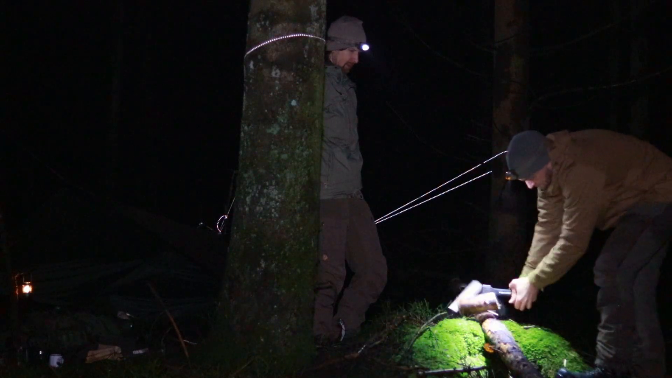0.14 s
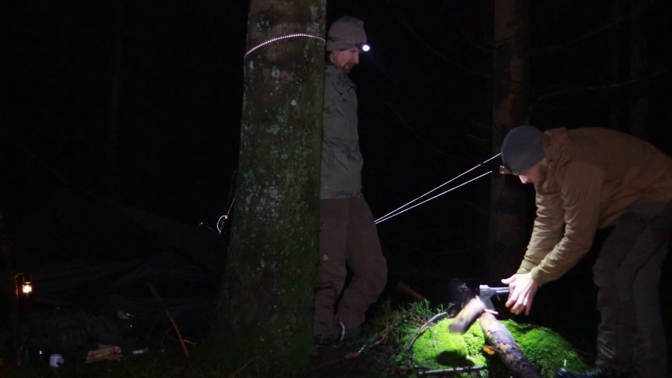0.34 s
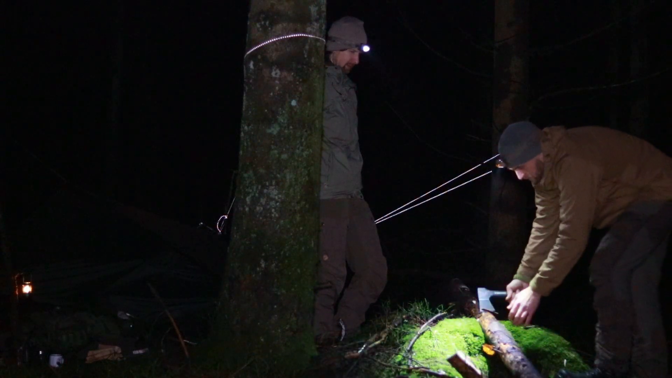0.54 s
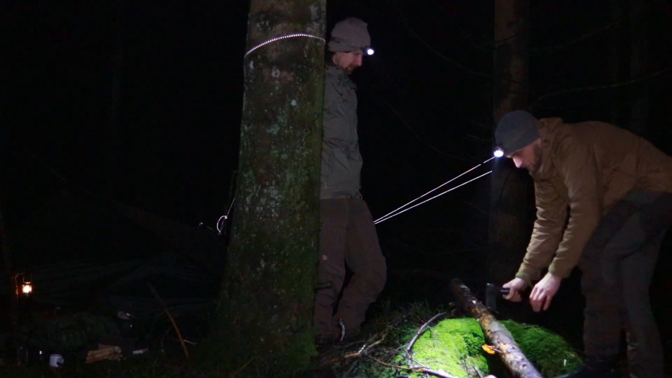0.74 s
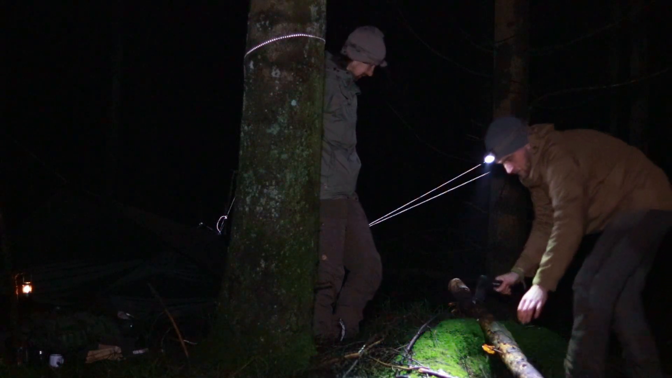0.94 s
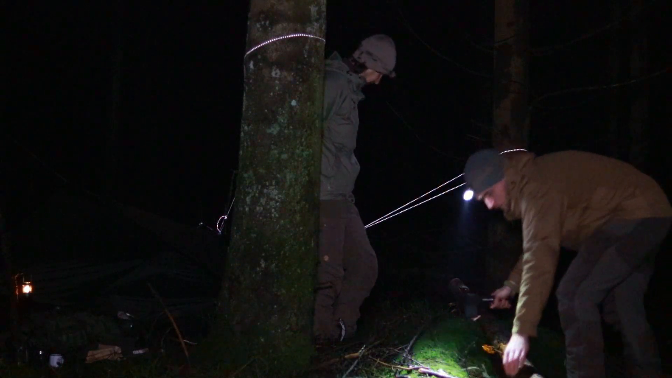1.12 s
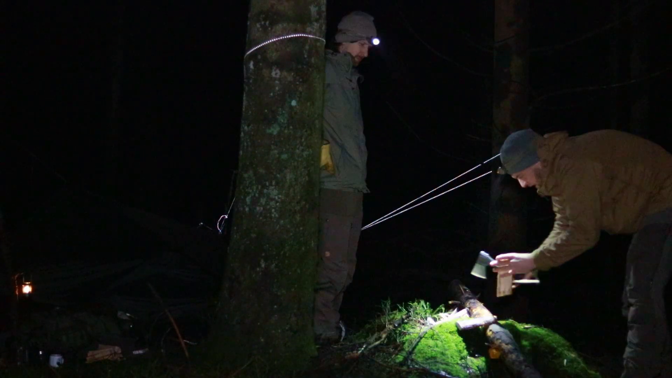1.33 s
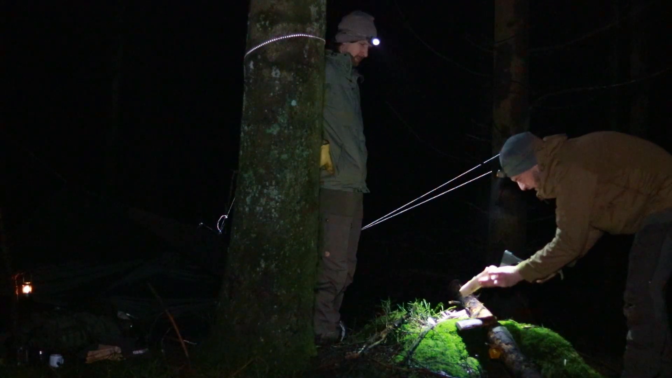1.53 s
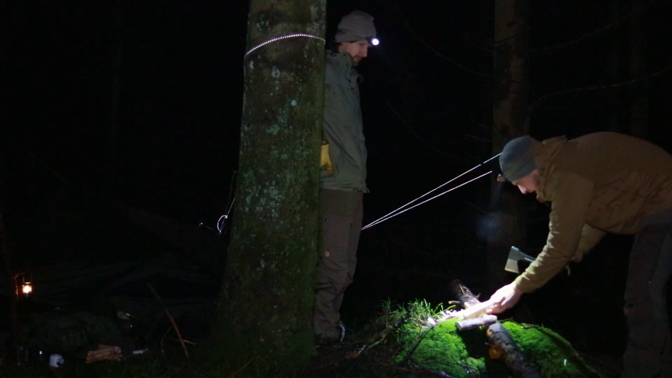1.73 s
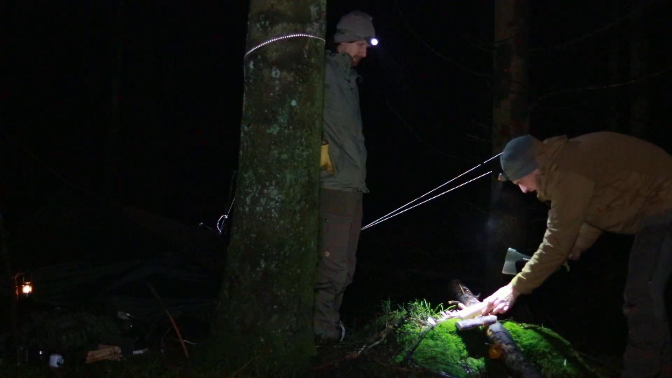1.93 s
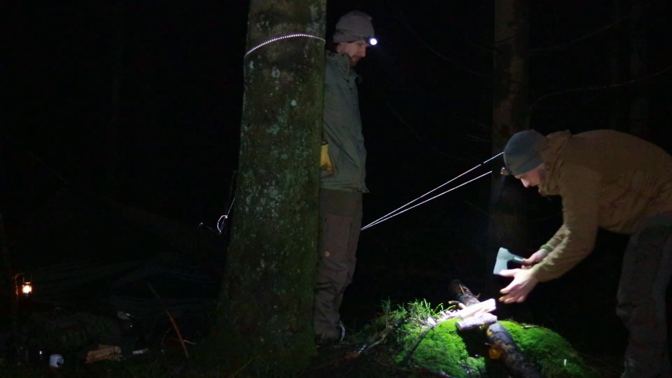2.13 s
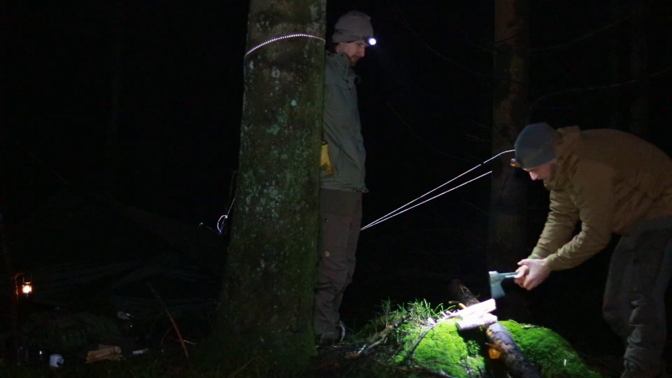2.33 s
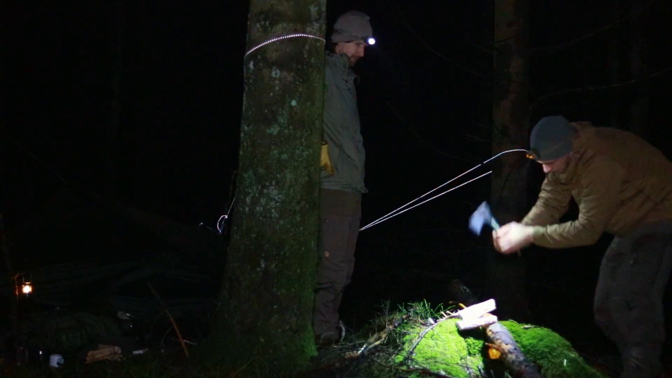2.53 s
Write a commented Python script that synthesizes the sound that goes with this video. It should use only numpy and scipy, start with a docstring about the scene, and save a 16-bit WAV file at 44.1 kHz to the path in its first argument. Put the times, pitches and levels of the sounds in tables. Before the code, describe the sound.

One sharp hatchet chop cracks firewood on a log, trees echo, then a piece of wood knocks

```python
"""Splitting wood in a night forest

A hatchet splits a short billet on a log. Over a far hush and hiss, bands of noise, the log and billet thud
as ringing modes behind a sinking wave, and the steel head rings briefly as a set of short tones.
Cracks, ticks, an echo of the blow and parts of a later knock are dying noise bursts; the trunks scatter
the blow back as a wash of noise and tones. Later a piece of wood knocks on the log."""
import sys
import numpy as np
from scipy import signal
from scipy.io import wavfile

SR = 44100
rng = np.random.default_rng(int(sys.argv[2]) if len(sys.argv) > 2 else 0)


def voltage_ratio(decibels):
    """Convert decibels (scalar or array-like) to amplitude ratios, 20 dB per decade."""
    exponent = np.asarray(decibels, float) / 20
    return 10 ** exponent


def int16_out(signal):
    """Quantize to a 16-bit WAV file."""
    q = np.round(np.clip(np.atleast_2d(signal).T, -1, 1) * 32767)
    wavfile.write(sys.argv[1], SR, q.astype(np.int16))


N = 114660  # length in samples, 2.6 s


def rms_one(x):
    """Scales a sound to an rms of 1."""
    return x / np.sqrt(np.mean(x ** 2) + 1e-20)


def in_time(rows):
    """Draws straight lines through (second, value) rows, one value per sample."""
    return np.interp(np.arange(N) / SR, *np.transpose(rows))


def at_hz(points, hz):
    """Reads a (Hz, value) curve at one pitch, on a logarithmic pitch scale."""
    points = np.array(points)
    return np.interp(np.log(hz), np.log(points[:, 0]), points[:, 1])


def drift(rate_hz):
    """Slow random wander with an rms of 1: smoothed noise, made at every 40th sample and joined by lines."""
    pole = np.exp(-80 * np.pi * rate_hz / SR)
    white = rng.standard_normal(N // 40 + 2002)
    slow = signal.lfilter([1], [1, -2 * pole, pole * pole], white)[2000:]  # drop the filter's start-up
    return np.interp(np.arange(N) / 40, np.arange(len(slow)), rms_one(slow))


def ring(clicks, hz, t60):
    """A unit click sets off a sine of height 1 that falls by 60 dB in t60 seconds."""
    pole, turn = voltage_ratio(-60 / (t60 * SR)), 2 * np.pi * hz / SR
    # the tiny offset keeps the filter from slowing down on near-zero numbers
    return signal.lfilter([0, np.sin(turn)], [1, -2 * pole * np.cos(turn), pole * pole], clicks + 1e-18)


def resonance(x, hz, width):
    """Lets through a narrow band, width in Hz, with a gain of about 1 at its centre."""
    pole = np.exp(-np.pi * width / SR)
    top = np.array([1, 0, -1]) * (1 - pole * pole) / 2
    return signal.lfilter(top, [1, -2 * pole * np.cos(2 * np.pi * hz / SR), pole * pole], x)


def banded_noise(spectrum, patchy_db, shape=lambda hz: 0):
    """Third-octave bands of noise, each with its own level, random flicker and course in time, in dB."""
    out, edges = 0, 22 * 2 ** np.arange(0, 9.8, 1 / 3)
    white = rng.standard_normal((2, N))
    for k, (low, high) in enumerate(zip(edges, edges[1:])):
        hz = np.sqrt(low * high)
        sos = signal.butter(2, [low, high], "band", fs=SR, output="sos")
        band = signal.sosfilt(sos, white[k % 2])  # neighbours use separate noise
        level_db = at_hz(spectrum, hz) + patchy_db * drift(11.1) + shape(hz)
        out = out + band * voltage_ratio(level_db)
    return out


# Colour of the far hush and recorder hiss. Each row: pitch in Hz, relative level in dB per Hz.
NIGHT_COLOUR = [(15, -80), (25, -44), (76, -19.5), (146, -14.5), (176, -14.5), (244, -5.5), (376, -3),
                (596, -2), (1760, -14), (2640, -22), (2870, -21.5), (14200, -28), (16200, -26.5)]
# Course of the hush and hiss. Each row: time in seconds, level in dB before a small lift.
NIGHT_COURSE = [(0.0, -52), (0.25, -50.5), (0.38, -50), (0.81, -50.5), (2.45, -50), (2.6, -49.5)]
NIGHT_PATCHY_DB = -0.4  # depth of the flicker; the sign only turns it over


def night():
    """Far hush and recorder hiss: steady noise in bands that flicker slightly."""
    lift_db = 0.94
    hush = rms_one(banded_noise(NIGHT_COLOUR, NIGHT_PATCHY_DB))
    return voltage_ratio(in_time(NIGHT_COURSE) + lift_db) * hush


# How strongly the trunks send the blow back. Each row: time in seconds, level in dB.
SCATTER_COURSE = [(.232, -22.5), (.26, -37.5), (.29, -37), (.36, -36), (.41, -33.5), (.47, -38),
                  (.55, -39.5), (.7, -42.5), (1.0, -48), (1.4, -48.5), (2.0, -83)]
# Broad colour of the echo. Each row: pitch in Hz, relative level in dB per Hz.
ECHO_COLOUR = [(240, -61), (400, -8.5), (719, -7.5), (826, -8.5), (1730, -19), (1840, 4.5), (2020, -2),
               (2290, 4.5), (3310, -9.5), (4380, -7.5), (5780, -13), (7870, -16.5), (16000, -35)]
# Extra loss on the way. Each row: pitch in Hz, loss in dB per second since the blow.
PATH_LOSS = [(400, 47), (1000, 16), (2000, 12), (4400, 16), (7500, 19), (12000, 62)]
# Wood and steel tones carried by the echo. Each row: pitch in Hz, width in Hz, level in dB against the wash.
CARRIED_TONES = [(721, 27, -12.5), (1864, 22, -6), (4360, 200, -4.5), (7560, 500, -14), (12500, 980, -22)]
# Bright early return from the nearest trunks. Each row: pitch in Hz, relative level in dB per Hz.
NEAR_COLOUR = [(1760, -33), (3000, -6), (3630, -37), (4300, -13), (5430, -21), (7850, 11), (16200, -19)]
BLOW_S, ECHO_PATCHY_DB = .232, 1.5
NEAR_DB, NEAR_T60_S = -40.5, 0.78


def forest():
    """Countless trunks return the blow as a wash that dips, swells and dies, the middle pitches last."""
    since = np.maximum(np.arange(N) / SR - BLOW_S, 0)
    wash = banded_noise(ECHO_COLOUR, ECHO_PATCHY_DB, lambda hz: -at_hz(PATH_LOSS, hz) * since)
    early = wash[int(.25 * SR):int(.45 * SR)]
    wash = wash / np.sqrt(np.mean(early ** 2))  # rms 1 just after the blow
    for hz, width, db in CARRIED_TONES:
        tone = resonance(rng.standard_normal(N), hz, width)
        tone = resonance(tone, hz, 3 * width)
        wash = wash + rms_one(tone) * voltage_ratio(db - at_hz(PATH_LOSS, hz) * since)
    near = rms_one(banded_noise(NEAR_COLOUR, ECHO_PATCHY_DB))
    near = near * voltage_ratio(NEAR_DB - 60 * since / NEAR_T60_S)
    return (wash * voltage_ratio(in_time(SCATTER_COURSE)) + near) * (since > 0)


# Short noise bursts: cracks, ticks, an echo of the blow, a knock and its faint forest tail.
# Each row: start in seconds, level in dB, centre in Hz, width in octaves, time to fall by 60 dB in seconds.
NOISE_BURSTS = [(0.2253, -15, 2400, 0.83, 0.011), (.2285, -58, 3500, 1.6, .012),
                (0.231, -14, 5960, 1.56, 0.028), (.2352, -19, 6000, 3.2, .014),
                (.2410, -25, 4500, 2.8, .01), (.2461, -19, 5500, 3.4, .013), (.3645, -26, 4200, .4, .012),
                (.3785, -26, 2700, .5, .012), (.5572, -27, 1144, 0.56, 0.012),
                (0.5805, -46, 10800, 0.84, 0.19), (0.5897, -31.5, 4630, .2, 0.016),
                (.578, -30, 4750, 0.23, 0.013), (.630, -45, 9000, 1.2, 0.0072),
                (0.8997, -36.5, 8800, 1.3, 0.011), (1.0737, -36.5, 6960, 1.4, 0.0052),
                (1.0748, -34.5, 790, 3.1, 0.012), (1.078, -49, 12500, .6, .012),
                (1.0904, -35, 2120, 1.2, 0.00656), (1.1508, -36.5, 5400, 1.6, 0.0068),
                (1.1567, -19, 3480, 3.7, 0.0078), (1.1563, -29, 7400, 1.7, 0.0043),
                (1.172, -42, 5500, .8, .012), (1.137, -47, 5500, 1.5, .04), (1.160, -37.5, 3880, 2.9, 0.03),
                (1.164, -58, 5000, 1.8, 1), (1.375, -55, 4950, 1.2, 0.0175),
                (1.3912, -38.5, 3200, 0.64, 0.014), (1.3908, -46.5, 7500, 0.61, 0.0113),
                (1.402, -49, 6960, 1.1, 0.018), (1.425, -48, 5370, 1, .04), (1.435, -46, 5370, 1.4, 0.036),
                (1.45, -40, 883, 2.5, 0.009), (1.31, -59, 12500, 0.5, .1), (1.80, -48, 2200, .7, .012),
                (1.861, -47, 4200, .2, .02), (1.861, -47.5, 8450, 0.63, 0.013)]
BURST_EDGE = 1.81  # the first instant of a burst, against its noise


def noise_bursts():
    """Each burst is noise in a band that dies away evenly in dB, with a definite first instant."""
    out, t = np.zeros(N), np.arange(12000) / SR
    noise = rng.standard_normal((len(NOISE_BURSTS), len(t)))
    noise[:, 0] = BURST_EDGE
    for (s, db, hz, octaves, t60), white in zip(NOISE_BURSTS, noise):
        half = 2 ** (octaves / 2)
        edges = np.clip([hz / half, hz * half], 50, .45 * SR)
        sos = signal.butter(2, edges, "band", fs=SR, output="sos")
        fade = voltage_ratio(-60 * t / t60)
        burst = rms_one(signal.sosfilt(sos, white * fade))
        burst = burst * np.sqrt(np.mean(fade ** 2))  # short bursts carry less energy
        start = int(s * SR)
        out[start:start + len(t)] += voltage_ratio(db) * burst
    return out


# Times when steel tones start: the blow, its echo, and a later tap.
# Each row: start in seconds, level in dB, tilt in dB per octave around 2000 Hz.
STEEL_STARTS = [(0.2307, -5.5, -1.5), (.2330, -12, -3), (.2461, -45, .5), (0.5764, -41, 11.5)]
# Tones of the hatchet head. Each row: pitch in Hz, level in dB against the start's level,
# time to fall by 60 dB in seconds.
HEAD_MODES = [(1862, -21, .3), (1940, -5, .025), (2190, -6, .02), (2400, -5, .02), (3020, -4, .015),
              (4370, -4, .02), (4890, -3, .015), (5780, -5, .012), (7500, -2, .012), (8900, -4, .008),
              (11700, .5, .006), (13700, -9, .005)]


def steel():
    """Every start rings the same modes of the head, brighter or duller by its tilt."""
    out, (s, level_db, tilt) = 0, np.transpose(STEEL_STARTS)
    for k, (hz, db, t60) in enumerate(HEAD_MODES):
        clicks = np.zeros(N)
        height = voltage_ratio(db + level_db + tilt * np.log2(hz / 2000))
        clicks[(s * SR).astype(int)] = (-1) ** k * height  # every other mode starts downwards
        out = out + ring(clicks, hz, t60)
    return signal.sosfilt(signal.butter(2, 900, "high", fs=SR, output="sos"), out)


# Pushes on the log. Each row: start in seconds, level in dB, sharpness in Hz,
# share of the free ring time, pitch in Hz below which the knock is thin.
LOG_KNOCKS = [(0.2307, -7, 1500, 0.75, 121), (0.2317, -23, 2500, .9, 99), (1.1502, -36.5, 450, 0.48, 170),
              (1.1547, -26, 450, .6, 180), (1.392, -43.5, 600, 0.98, 202)]
# Tones of log and billet. Each row: pitch in Hz, level in dB against the push,
# free ring time in seconds to fall by 60 dB.
WOOD_MODES = [(153.5, -27, 0.22), (185, -5, 0.028), (237.5, -4, 0.22), (333.2, -1.5, 0.22),
              (378, -17, 0.058), (465, -5.5, 0.041), (604, -6, 0.052), (718, -0.5, 0.073),
              (888, -13, 0.033), (976, -4, 0.038), (1100, 4, 0.011), (1340, -0.5, 0.024), (1500, -3, 0.027)]
# the blow runs along the log as a bending wave, high pitches first
WAVE_S, WAVE_DB, WAVE_FROM_HZ, WAVE_TO_HZ = .2233, -1, 1090, 259
WAVE_SINK_S, WAVE_RISE_S, WAVE_FADE_S = 0.0036, .0025, 0.0081


def wood():
    """Each push, softened by its contact time, rings the log's modes; the big blow sends a sinking wave ahead."""
    out, t = np.zeros(N), np.arange(SR // 2) / SR
    for s, level_db, sharp_hz, share, thin_hz in LOG_KNOCKS:
        pulse = t * np.exp(-2 * np.pi * sharp_hz * t)
        push = pulse / pulse.sum()
        rung = sum(voltage_ratio(db) * ring(push, hz, t60 * share) for hz, db, t60 in WOOD_MODES)
        rung = signal.sosfilt(signal.butter(3, thin_hz, "high", fs=SR, output="sos"), rung)
        start = int(s * SR)
        out[start:start + len(t)] -= voltage_ratio(level_db) * rung
    t = np.maximum(np.arange(N) / SR - WAVE_S, 0)
    pitch = WAVE_TO_HZ + (WAVE_FROM_HZ - WAVE_TO_HZ) * np.exp(-t / WAVE_SINK_S)
    rise = 1 - np.exp(-(t / WAVE_RISE_S) ** 2)
    fade = np.exp(-(t / WAVE_FADE_S) ** 2)
    wave = np.sin(2 * np.pi * np.cumsum(pitch * (t > 0)) / SR)
    return out + voltage_ratio(WAVE_DB) * rise * fade * wave


def scene():
    """Close sounds over the far wash, whose top is cut a little lower."""
    hiss_top = signal.cheby2(14, 40, 15900, fs=SR, output="sos")  # Hz
    far = signal.sosfilt(hiss_top, night() + forest())
    close = noise_bursts() + steel() + wood()
    return (far + close)[None]


def roll_off(x):
    """The treble ends steeply here."""
    return signal.sosfilt(signal.butter(12, 16400, fs=SR, output="sos"), x)


def record(dry):
    """Peaks are rounded softly, then the top is cut."""
    ceiling, cutoff_hz = 1.5, 17200
    rounded = ceiling * np.tanh(dry / ceiling)
    mix = signal.sosfilt(signal.cheby2(10, 40, cutoff_hz, fs=SR, output="sos"), rounded)
    return roll_off(mix)


dry = scene()
out = record(dry)
int16_out(out)
```